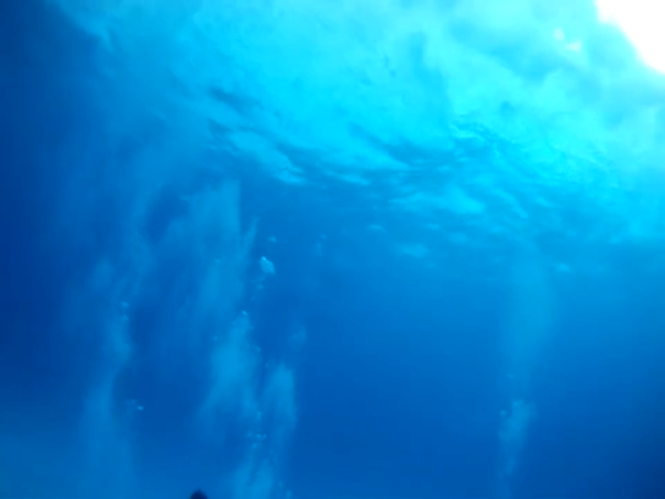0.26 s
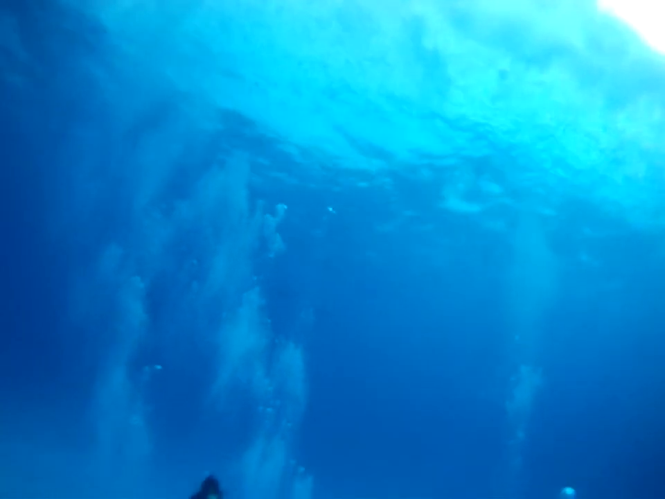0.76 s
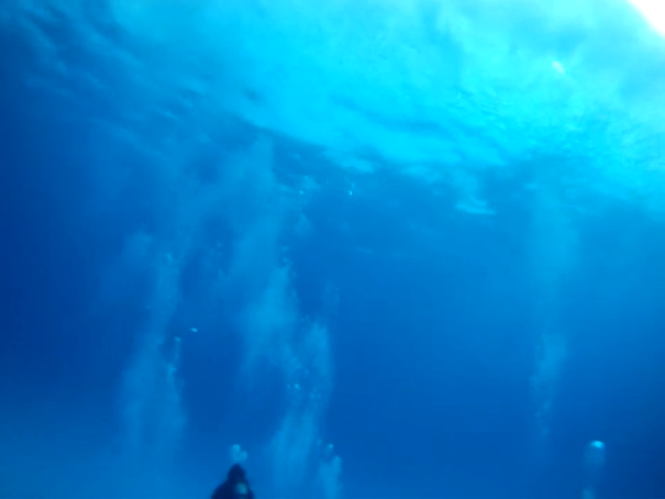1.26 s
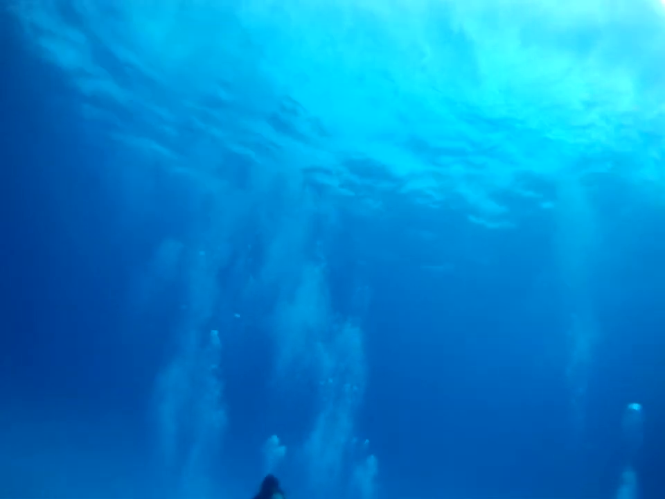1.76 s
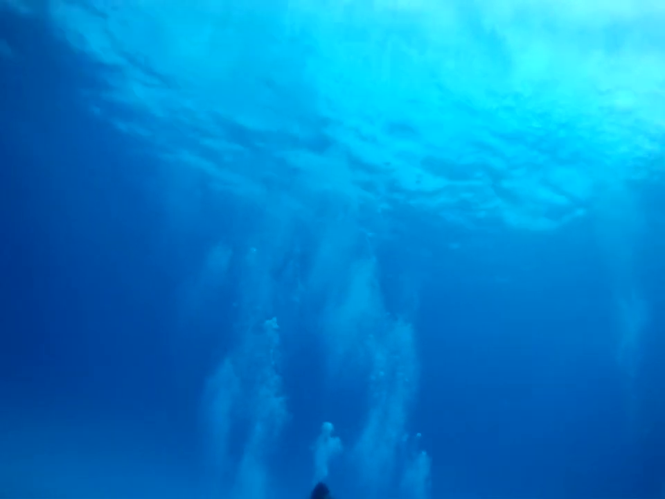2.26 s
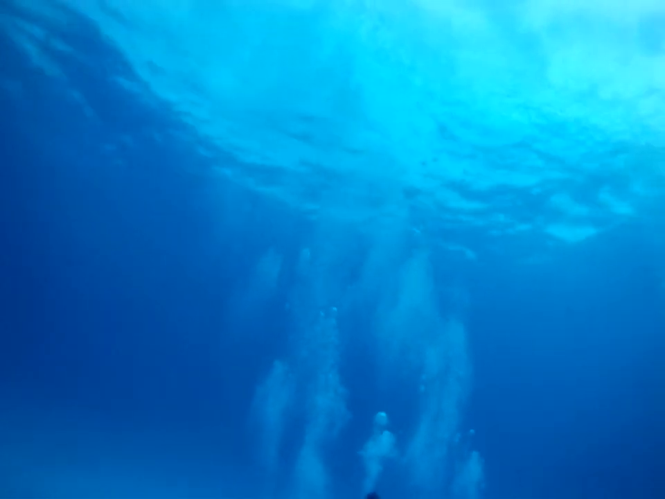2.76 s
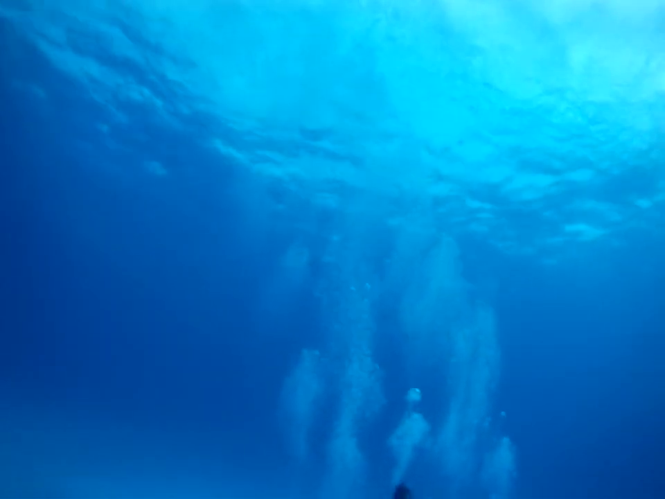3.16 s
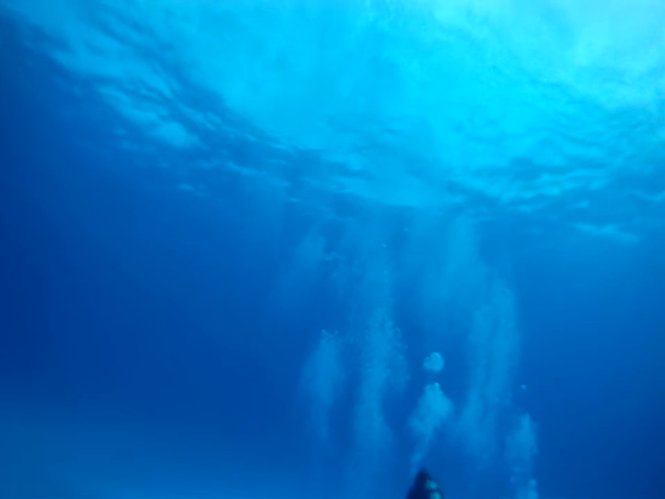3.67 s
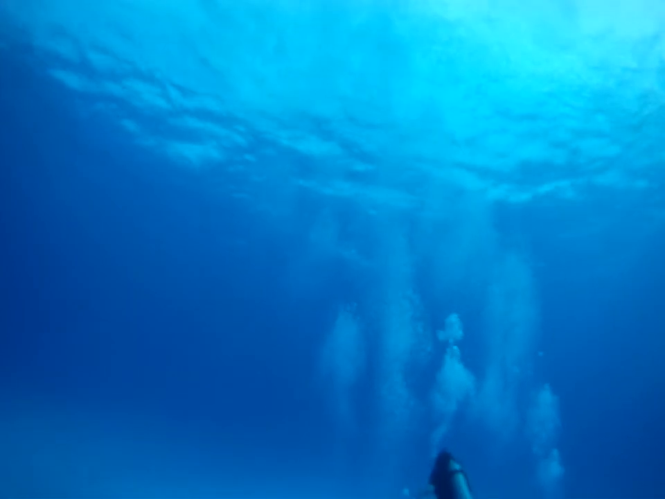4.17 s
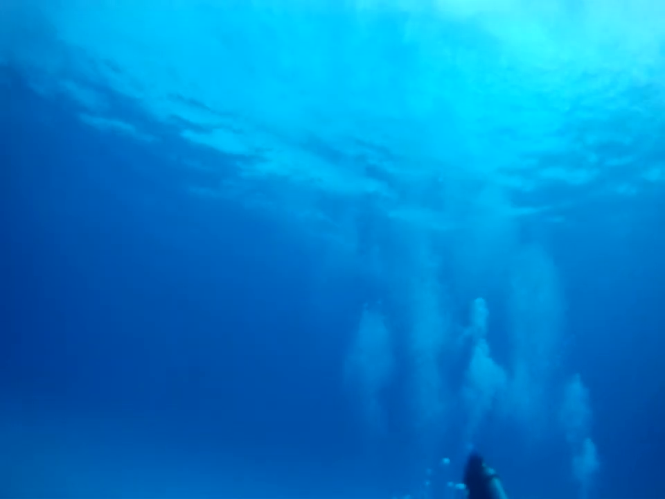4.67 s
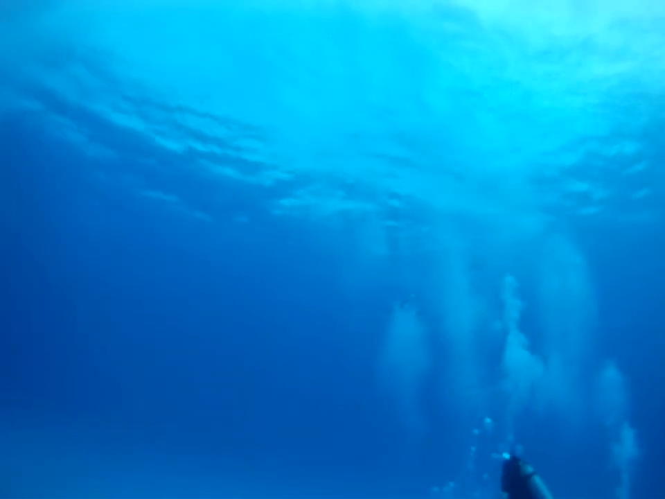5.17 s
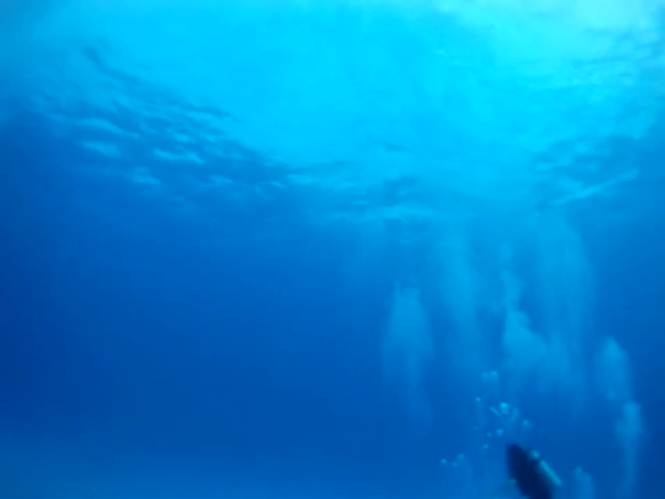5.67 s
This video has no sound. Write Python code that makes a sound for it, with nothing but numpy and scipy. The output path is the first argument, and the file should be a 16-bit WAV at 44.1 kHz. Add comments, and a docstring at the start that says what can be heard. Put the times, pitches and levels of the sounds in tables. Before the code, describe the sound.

Heard underwater through a small housed camera: a boat with two propellers starts loud, a very deep hum fluttering about seven times a second under a rough mid-pitched hiss. It draws away and fades. From about two seconds, divers' bubbles gurgle and plop close by, thickest between three and five seconds, then thin out over a faint wash.

```python
"""Twin-engined boat heard under water

A boat passes overhead and draws away. Two propellers turn at slightly different speeds, so their
deep notes, made of sine waves, beat about seven times a second. Filtered noise makes the cavitation hiss,
and unsteady sines the singing of a blade. Ringing sines make the bubbles, far and near.
The camera samples slowly and holds each sample, which mirrors the sound into a thin treble fizz."""
import sys
import numpy as np
from scipy import signal
from scipy.fft import rfft, irfft
from scipy.io import wavfile

SR = 44100
rng = np.random.default_rng(int(sys.argv[2]) if len(sys.argv) > 2 else 0)


def wav_out(sig):
    """Save sig, one row per channel (or a flat mono array), as 16-bit PCM at SR to the path in sys.argv[1]."""
    wavfile.write(sys.argv[1], SR, np.round(np.clip(np.atleast_2d(sig).T, -1, 1) * 32767).astype(np.int16))


N = 261052
TIME = np.arange(N) / SR  # seconds
BINS = np.fft.rfftfreq(N, 1 / SR)  # Hz

# strength of the wash behind the boat, which drives both hiss and singing: [t/s, level/dB]
WASH = [(0, -29.5), (.35, -31), (1.0, -35), (2.7, -38.5), (3.95, -39), (5.35, -44), (5.85, -40.5)]
# single bubbles close to the camera: [t/s, f/Hz, level/dB]
NEAR = [ (1.045, 613, -16.5), (1.928, 359, -15), (2.328, 550, -23), (2.483, 395, -20), (2.487, 204, -22),
        (2.635, 836, -13), (2.648, 1670, -22), (2.955, 2500, -29), (2.983, 2900, -31), (3.190, 680, -19),
        (3.318, 788, -18), (3.333, 350, -20.5), (3.443, 1500, -23.5), (3.694, 435, -20.5),
        (3.698, 1045, -23.5), (3.876, 1615, -20), (3.945, 1420, -18.5), (4.007, 5060, -32.5),
        (4.089, 2360, -19), (4.235, 1370, -23.5), (4.239, 216, -22.5), (4.273, 882, -19),
        (4.299, 1414, -17), (4.299, 5100, -40), (4.468, 4720, -42), (4.517, 4780, -39),
        (4.518, 3640, -26.5), (4.700, 882, -16.5), (4.730, 835, -17.5), (4.777, 1780, -23.5),
        (4.803, 834, -18), (4.808, 1620, -23.5), (4.885, 1370, -26), (5.058, 1160, -27),
        (5.136, 734, -24.5), (5.282, 680, -20.5), (5.360, 900, -18.5), (5.726, 280, -24),
        (5.729, 470, -21.5), (5.738, 760, -29)]


def propeller(blade_rows, orders, drone_db):
    """Each passing blade pushes the water: a deep note, a faint undertone and weaker wavering orders."""
    in_step_s = 0.073  # the two propellers' notes swell together at this moment
    blade_db, undertone_db = 0.5, -35.0  # blade trim; undertone relative to the blade note
    churn, churn_hz = 0.097, 13  # unsteadiness of the blade note in the churned water
    waver_db, waver_hz = 3.0, 4.0  # the orders waver on their way under the waves
    drift_turns, drift_hz = 0.1, 2.5
    fade_db_per_s = 0.6  # the orders fade slowly with distance

    hz, level_db = follow(blade_rows)
    turns = np.cumsum(hz) / SR  # cycles of the blade note
    turns -= np.interp(in_step_s, TIME, turns)
    steady_turns = np.mean(hz) * TIME  # the drive itself holds its speed

    note = np.cos(2 * np.pi * turns) * (1 + churn * wander(churn_hz))
    undertone = amp(undertone_db) * np.cos(2 * np.pi * steady_turns * 3 / 4)
    blade = amp(level_db + blade_db) * (note + undertone)

    drone = np.zeros(N)
    for multiple, order_db in orders:
        level = amp(order_db + waver_db * wander(waver_hz))
        cycles = multiple * steady_turns + drift_turns * wander(drift_hz)
        drone += level * np.cos(2 * np.pi * cycles)
    drone *= amp(-42.5 - fade_db_per_s * TIME + drone_db)
    return np.sqrt(2) * (blade + drone), turns  # root two: the levels are rms, not peak


def octave(turns):
    """The second harmonic of the faster propeller swells once above a faint steady hum."""
    rest_db, swell_db = -54, -38.5
    level = amp(rest_db) + amp(swell_db) * swell(peak_s=1.26, width_s=0.8)
    return np.sqrt(2) * level * np.sin(4 * np.pi * turns)


def singing():
    """Turbulence rings a blade resonance: a rough note with a wide skirt, which follows the wash."""
    # brief surges of the singing: [t/s, gain/dB]
    surges = [(.077, 7), (.102, 6.5), (.168, 8), (.229, 5.5), (.305, 12), (.358, 4), (1.2, 12), (1.34, 10),
              (1.412, 12.5), (2.798, 6.5)]
    start_hz, rise_hz_per_s = 833.3, 4.0  # the resonance creeps upward
    core_hz, skirt_hz, skirt = 53.4, 150, 0.34  # speeds of the unsteadiness, share of the faster one
    surge_s, flutter_db = 0.011, 1.0

    angle = 2 * np.pi * np.cumsum(start_hz + rise_hz_per_s * TIME) / SR
    note = np.zeros(N)
    for wave in (np.cos, np.sin):
        note += (wander(core_hz) + skirt * wander(skirt_hz)) * wave(angle)

    lull_db = -13.5 * swell(peak_s=2.16, width_s=0.26)  # the singing dips once
    surge_db = sum(gain_db * swell(s, surge_s) for s, gain_db in surges)
    level_db = follow(WASH)[0] + lull_db + surge_db + flutter_db * wander(25)
    return amp(level_db) * note


def cavitation(turns):
    """Countless cavities collapse, a little more at each passing blade, and sound through the housing."""
    # broad colour of the hiss: [f/Hz, level per Hz/dB]
    hiss_colour = [(30, 3), (200, -13.5), (380, -6.5), (700, -2.5), (1050, -2), (1600, -6.5), (2300, -1),
                   (2520, -10.5), (3650, -12.5), (4200, -20), (4650, -30), (5250, -26.5), (5650, -31),
                   (6000, -38.5)]
    # peaks and hollows of the camera housing: [f/Hz, width/Hz, gain/dB]
    housing = [(820, 93, 3.5), (1216, 48, -19.5), (1473, 102, 5.5), (1722, 48, 3), (1835, 74, -9.5),
               (1906, 57, 6), (2012, 44, -7.5), (2124, 167, 4.5), (2980, 130, -8.5), (3100, 140, -1.5),
               (5100, 400, 7)]
    pops_per_s, pop_share, spread_db = 1500, 0.44, 1.5
    pulsing, flutter_db = 0.056, 0.62
    trim_db = 0.29

    strength = amp(spread_db * np.minimum(rng.exponential(1, N), 3))
    pops = rng.standard_normal(N) * strength * (rng.random(N) < pops_per_s / SR)
    collapse = rng.standard_normal(N) + pop_share * evened(pops)
    collapse *= 1 + pulsing * np.cos(2 * np.pi * turns)
    collapse *= amp(flutter_db * wander(26))

    housing_db = sum(db / (1 + (2 * (BINS - hz) / width) ** 2) for hz, width, db in housing)
    hiss = coloured(collapse, spectrum(hiss_colour) + housing_db, band=(1900, 4000))
    return amp(follow(WASH)[0] + trim_db) * hiss


def near_bubbles():
    """Single bubbles break loose beside the camera; large ones swell more slowly and ring longer."""
    ring_s, ring_slope = 0.044, 0.49  # 60 dB decay time at 1 kHz; power of pitch by which it shortens
    swell_cycles = 1.33
    out = np.zeros(N)
    for s, hz, db in NEAR + splinters() + plume():
        t60 = ring_s * (1000 / hz) ** ring_slope
        add(out, s, amp(db) * bubble(hz, t60, rise=0.064, onset_s=swell_cycles / hz))
    return scatter(out)


def splinters(count=3):
    """Weaker companions that each near bubble shakes loose, as rows [t/s, f/Hz, level/dB]."""
    latest_s, weaker_db = 0.025, -11
    below, above = 0.746, 0.31  # range of pitch around the near bubble's own, in octaves
    rows = []
    for s, hz, db in NEAR:
        for late, size in rng.random((count, 2)):
            octaves = above - (above + below) * size
            rows.append((s + latest_s * late, hz * 2 ** octaves, db + weaker_db))
    return rows


def plume(count=36):
    """A plume drifts close and sheds weaker bubbles at random, as rows [t/s, f/Hz, level/dB]."""
    from_s, to_s = 2.3, 5.4
    low_hz, high_hz = 170, 1500
    weak_db, strong_db = -35.0, -26.5
    when, size, force = rng.random((count, 3)).T
    s = from_s + (to_s - from_s) * when
    hz = low_hz * (high_hz / low_hz) ** size
    db = weak_db + (strong_db - weak_db) * force
    return list(zip(s, hz, db))


def scatter(x):
    """Neighbouring bubbles and the rippled surface throw back a short, diffuse tail."""
    wet_db, t60 = -13.5, 0.1  # tail level; seconds to fall by 60 dB
    t = np.arange(SR // 4) / SR
    tail = rng.standard_normal(len(t)) * amp(-60 * t / t60)
    tail *= t > 0.004  # the tail starts after 4 ms
    return x + amp(wet_db) * signal.oaconvolve(x, tail / np.linalg.norm(tail))[:N]


def gurgle():
    """Clouds of large bubbles gurgle as they rise past; sparse small ones tinkle among them."""
    # strength of the passing clouds: [t/s, level/dB]
    cloud_level = [(0, -45), (.7, -42.5), (1.1, -39), (1.8, -43), (2.4, -37), (3.3, -38), (4.3, -37),
                   (5.35, -42.5), (5.6, -41), (5.9, -43.5)]
    # colour of the clouds: [f/Hz, level per Hz/dB]
    cloud_colour = [(40, -25), (80, 2.5), (140, 3.5), (220, -1), (400, -2), (600, -0.5), (850, 2),
                    (1150, -16.5), (1600, -17), (2500, -51), (5000, -42)]
    tinkle_db = -15.0  # relative to the clouds
    large = swarm(np.geomspace(80, 3000, 56), per_s=18, cycles=29.2, spread_db=4.5)
    small = swarm(np.geomspace(950, 2100, 14), per_s=2.9, cycles=24, spread_db=-1.0)
    cloud = coloured(large, spectrum(cloud_colour), band=(170, 650))
    return amp(follow(cloud_level)[0]) * (cloud + amp(tinkle_db) * evened(small))


def swarm(pitches, per_s, cycles, spread_db):
    """Bubbles of each size ring at random moments and strengths, per_s times a second on average."""
    longest_s = 0.09
    out = np.zeros(N)
    for hz in pitches:
        strength = amp(spread_db * rng.uniform(-0.67, 1, N))
        starts = strength * (rng.random(N) < per_s / SR)
        ring = bubble(hz, min(cycles / hz, longest_s), rise=0.14, onset_s=0.0037)
        out += hz * signal.oaconvolve(starts, ring)[:N]  # higher pitches start out stronger
    return out


def bubble(hz, t60, rise, onset_s):
    """A freed bubble swells and rings, its pitch lifting a little as it dies by 60 dB in t60 seconds."""
    t = np.arange(int(t60 * SR) + 2) / SR
    decay = np.exp(-np.log(1000) * t / t60)
    onset = 1 - np.exp(-t / onset_s)
    # the squared time in the phase lifts the pitch by twice the rise
    return np.sin(2 * np.pi * hz * t * (1 + rise * t / t60)) * decay * onset


def amp(db):
    """Turns decibels into gain."""
    return 10 ** (np.asarray(db) / 20)


def evened(x):
    """Scales a sound to an rms of one."""
    return x / np.sqrt(np.mean(x ** 2) + 1e-20)


def follow(rows):
    """Draws straight lines through each column of a table, with a value at every sample."""
    s, *columns = np.transpose(rows)
    return [np.interp(TIME, s, c) for c in columns]


def spectrum(points):
    """Spreads a short spectrum in dB over every frequency bin."""
    hz, db = np.transpose(points)
    return np.interp(np.log(BINS + 1), np.log(hz), db)  # plus one avoids the log of zero


def coloured(x, colour_db, band):
    """Filters x, and scales it so that the given band in Hz has an rms of one."""
    z = rfft(x) * amp(colour_db)
    inside = (BINS > band[0]) & (BINS < band[1])
    return irfft(z, N) / np.std(irfft(z * inside, N))


def wander(rate_hz):
    """Random slow movement with an rms of one: noise without its faster part."""
    noise = rfft(rng.standard_normal(N))
    return evened(irfft(noise * np.exp(-(BINS / rate_hz) ** 2), N))


def swell(peak_s, width_s):
    """A smooth rise to one and fall back to zero."""
    return np.exp(-((TIME - peak_s) / width_s) ** 2)


def add(mix, s, sound):
    """Adds a sound to the mix, starting at s seconds."""
    part = mix[round(s * SR):][:len(sound)]
    part += sound[:len(part)]


def scene():
    """Adds up the two propellers, their wash, and the bubbles."""
    # each propeller's deep note as the boat draws away: [t/s, blade rate f/Hz, level/dB]
    slow_blades = [(0.0, 54.41, -21.3), (0.72, 53.09, -20.6), (1.32, 55.5, -28.6), (1.6, 52.03, -30.9),
                   (1.92, 54.61, -22.3), (2.32, 53.11, -23.3), (3.0, 54.21, -30.5), (3.24, 52.97, -32.2),
                   (3.6, 54.32, -29.9), (5.0, 52.55, -35.7), (5.28, 54.01, -36.4), (5.92, 53.69, -37.9)]
    fast_blades = [(0.0, 59.97, -21.2), (0.36, 60.73, -18.5), (0.72, 60.0, -23.5), (1.56, 60.74, -31.9),
                   (1.88, 61.11, -25.5), (2.24, 60.57, -33.8), (2.56, 61.28, -29.3), (3.12, 60.53, -33.3),
                   (3.92, 61.3, -38.8), (4.48, 61.18, -34.6), (5.08, 60.24, -38.2), (5.92, 60.76, -45.2)]
    # weaker orders of each drive: [multiple of the blade rate, relative level/dB]
    slow_orders = [(2, -8), (2.5, -10), (3, -6)]
    fast_orders = [(1.25, -10), (2.25, -10), (3, -11)]

    slow, _ = propeller(slow_blades, slow_orders, drone_db=-1.0)
    fast, turns = propeller(fast_blades, fast_orders, drone_db=-3.0)
    boat = slow + fast + octave(turns) + singing() + cavitation(turns)
    return (boat + near_bubbles() + gurgle())[None]  # one channel


def record(dry):
    """The microphone sheds deep bass; held slow samples mirror the sound upward; a band limit follows."""
    low_cut_hz, hold_hz, edge_hz = 38, 12000, 15330
    high_pass = signal.butter(3, low_cut_hz, "high", fs=SR, output="sos")
    heard = signal.sosfilt(high_pass, dry)
    slow = signal.resample_poly(heard, hold_hz, SR, axis=1, window=("kaiser", 4))
    # each slow sample is held for four faster ones: mirror images appear on both sides of hold_hz
    steps = np.repeat(slow, 4, axis=1)
    held = signal.resample_poly(steps, SR, 4 * hold_hz, axis=1)[:, :N]
    band_limit = signal.firwin(1023, edge_hz, window=("kaiser", 9), fs=SR)
    return signal.oaconvolve(held, band_limit[None], "same")


dry = scene()
out = record(dry)
wav_out(out)
```